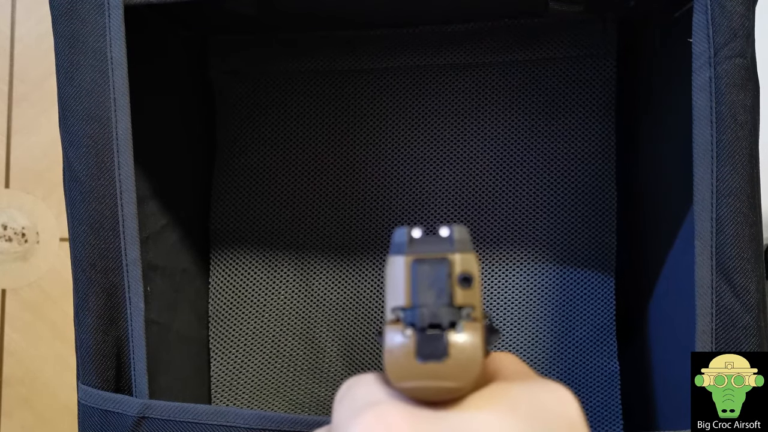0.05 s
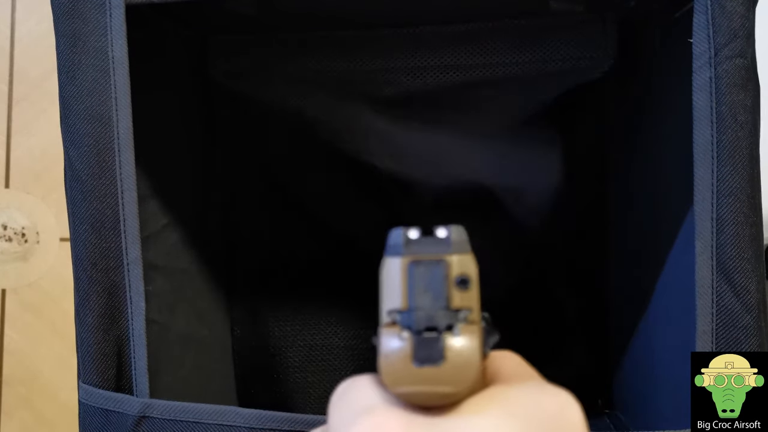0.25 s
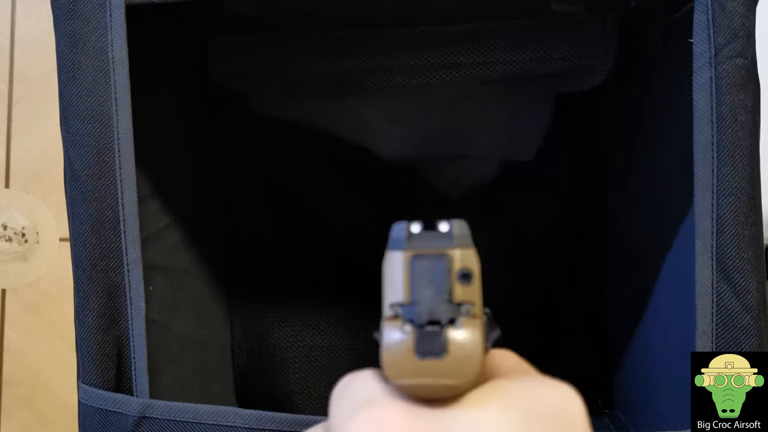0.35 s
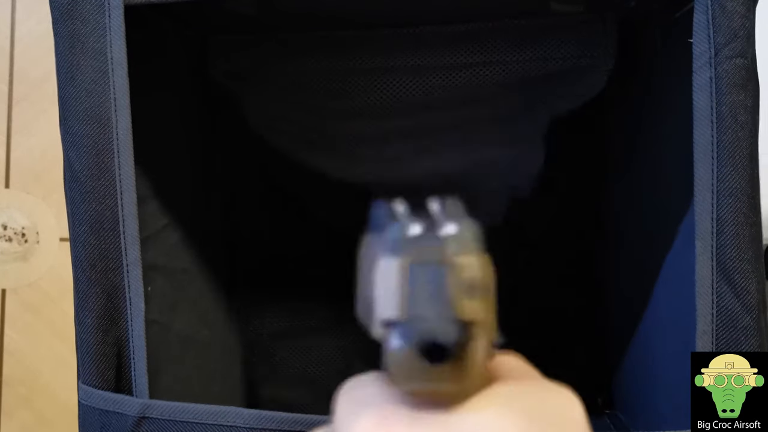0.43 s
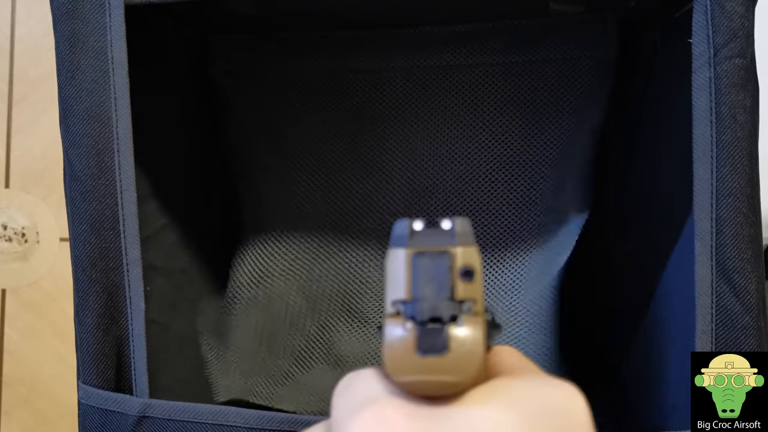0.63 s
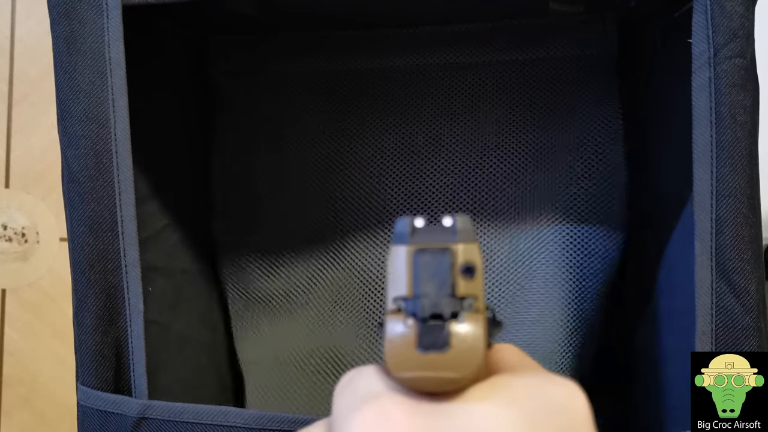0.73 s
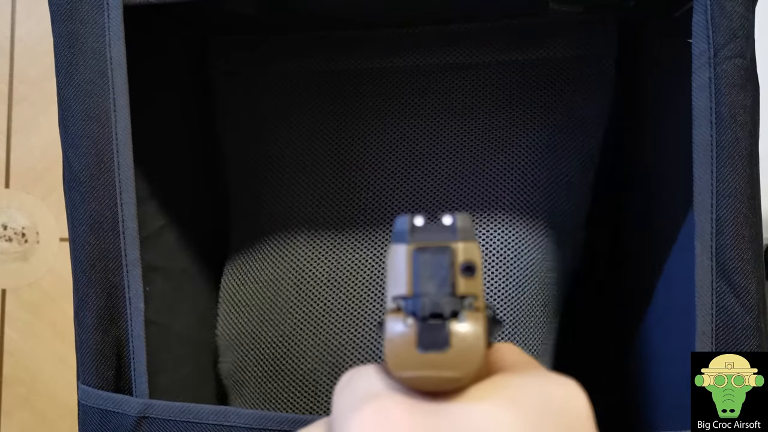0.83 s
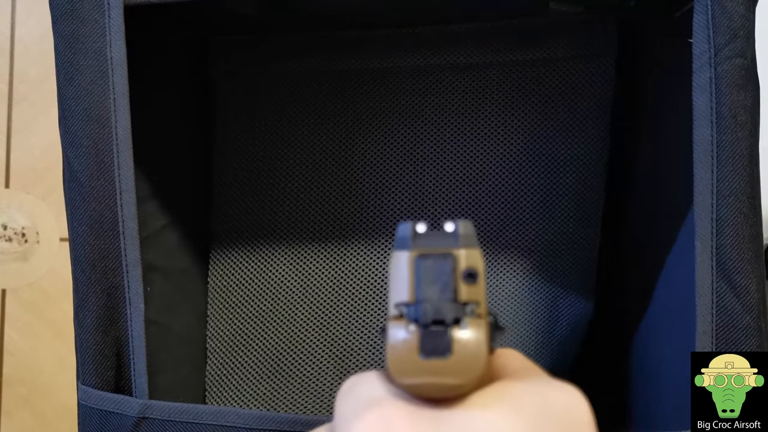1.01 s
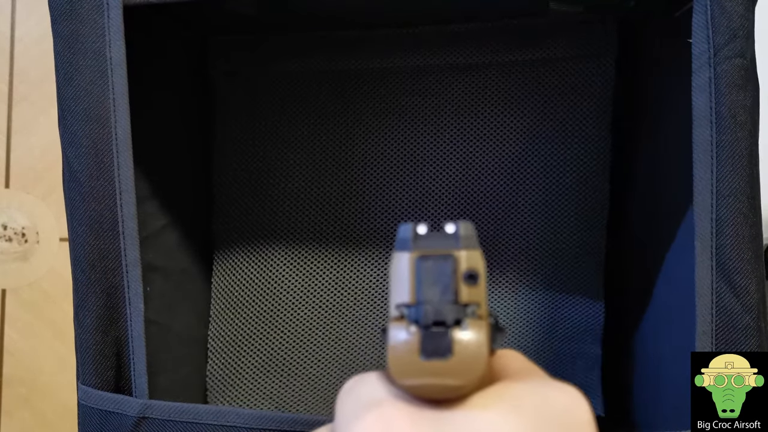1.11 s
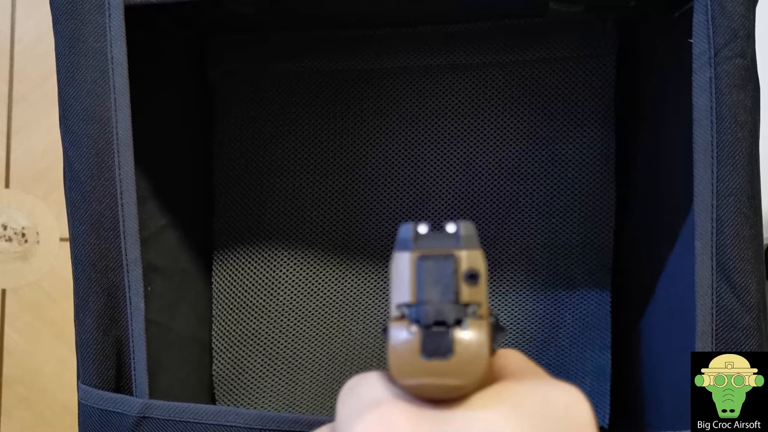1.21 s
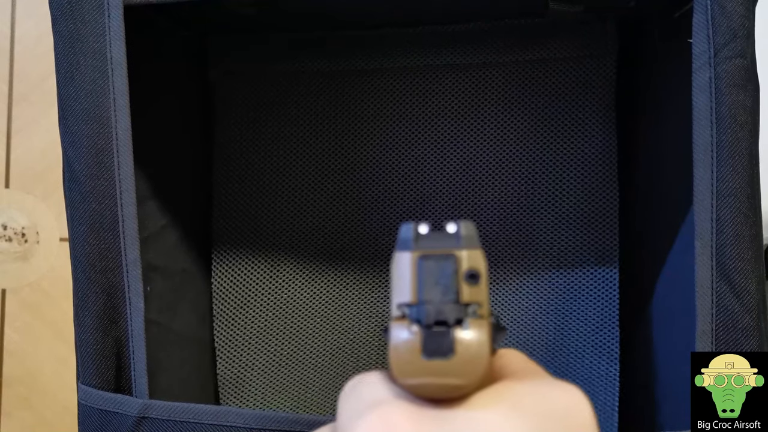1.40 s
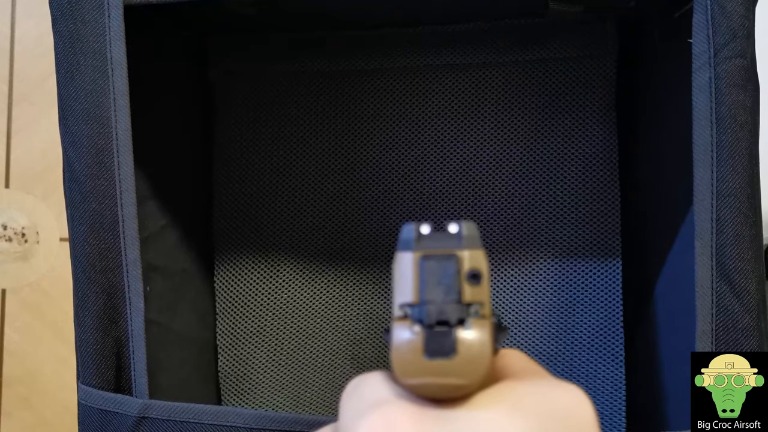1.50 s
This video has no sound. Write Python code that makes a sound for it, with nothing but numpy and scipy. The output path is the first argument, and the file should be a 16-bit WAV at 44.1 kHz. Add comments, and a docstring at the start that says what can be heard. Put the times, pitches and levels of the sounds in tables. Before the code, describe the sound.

A gas airsoft pistol fires at close range in a small room. Faint low motor hum and room noise come first, then a sharp shot at 0.23 seconds with gas hiss, a brief thump and metallic slide clatter, slamming home at 0.28. A second similar shot follows at 0.5. High ringing and short bright reverberation die away, leaving quiet hum and a tiny tick near 1.0.

```python
"""A gas airsoft pistol fires twice at close range in a small room: shaped noise makes the gas hiss, a decaying
sine the thump of air, noise bursts the slide's clatter and slam, decaying sines a high narrow ringing and the
dull frame modes. Noise with frequency-dependent decay gives the room's answer; a motor hums in sines over room
noise, with one faint tick. Automatic gain ducks at each shot and recovers."""
import sys
import numpy as np
from scipy import signal
from scipy.fft import rfft, irfft, next_fast_len
from scipy.io import wavfile
from scipy.ndimage import uniform_filter1d, map_coordinates

SR = 44100
rng = np.random.default_rng(int(sys.argv[2]) if len(sys.argv) > 2 else 0)


def store_wav(level_fs):
    """Save 16-bit WAV to argv[1]."""
    pcm = np.round(np.clip(np.atleast_2d(level_fs), -1, 1) * 32767)
    wavfile.write(sys.argv[1], SR, pcm.T.astype(np.int16))


N = 68355
T = np.arange(N) / SR

# shots: (time [s], gas level [dB], thump level [dB], room answer level [dB])
SHOTS = [(0.229, 2.5, 10, -15.5), (.498, 2, 8.5, -13.5)]


def amp(db):
    """Amplitude factor from dB."""
    return 10 ** (np.asarray(db) / 20)


def unit(x):
    """x scaled to rms 1."""
    return x / np.sqrt(np.mean(x ** 2) + 1e-20)


def along(points, hz):
    """(Hz, value) points interpolated on a log frequency axis."""
    f, v = np.transpose(points)
    return np.interp(np.log(hz + 1), np.log(f + 1), v)


def wobble(rate_hz):
    """Smooth random curve with rate_hz knots a second."""
    knots = rng.standard_normal(int(N * rate_hz / SR) + 4)
    return map_coordinates(knots, [T * rate_hz])


def filtered(x, response):
    """x filtered by a function of frequency."""
    m = next_fast_len(N + 8192)
    return irfft(rfft(x, m) * response(np.fft.rfftfreq(m, 1 / SR)), m)[..., :N]


def rush(spectrum, alike):
    """Stereo noise of rms 1: spectrum in (Hz, dB), left-right correlation in (Hz, -1..1)."""
    def mid_side(hz):
        turn = np.arccos(np.clip(along(alike, hz), -1, 1)) / 2
        return amp(along(spectrum, hz)) * [np.cos(turn), np.sin(turn)]

    mid, side = filtered(rng.standard_normal((2, N)), mid_side)
    return unit(np.array([mid + side, mid - side]))


def fall(start_s, t60_s):
    """Envelope with a sharp onset at start_s and exponential decay."""
    onset_s = 0.0006
    t = np.maximum(T - start_s, 0)
    return (1 - np.exp(-t / onset_s)) * amp(-60 * t / t60_s)


def pan(db):
    """Channel gains for left over right in dB."""
    return amp([[db / 2], [-db / 2]])


def background():
    """Motor sines wavering in level and phase, over shaped room noise, with a faint noise-burst tick."""
    # motor lines: (frequency [Hz], relative level [dB])
    motor_lines = [(48.4, -65.5), (70.0, -68.5), (145.3, -67), (193.8, -60.5), (242.2, -71.5), (339.1, -75)]
    # room noise spectrum: (frequency [Hz], relative level [dB per Hz])
    air_colour = [(12, -33.5), (20, -4.5), (58, -3.06), (104, -2), (198, -13), (285, -11.5), (485, -17.5),
                  (698, -16.5), (1090, -22.5), (1480, -21.5), (3300, -25.5), (4200, -32), (6500, -34.5),
                  (7730, -33), (9000, -46.5), (16000, -75.5)]
    # room noise: (frequency [Hz], left-right correlation [-1..1])
    air_alike = [(50, 1), (300, .8), (2000, .6), (8000, 0.13)]
    # faint tick: (time [s], level [dB])
    ticks = [(.998, -56)]
    # tick spectrum: (frequency [Hz], relative level [dB per Hz])
    tick_colour = [(200, -8), (800, -2), (3000, 0), (4000, -14), (9000, -32)]
    hum_offset_db, hum_waver_db, air_db = 1, 1.5, -62.5

    hum = 0
    for hz, db in motor_lines:
        level = amp(db + hum_offset_db + hum_waver_db * wobble(8))
        hum = hum + level * np.sin(2 * np.pi * hz * T + .4 * wobble(4.4))
    tick = sum(amp(db) * fall(s, 0.017) for s, db in ticks) * rush(tick_colour, [(500, 0.924)])
    air = amp(air_db + .5 * wobble(12)) * rush(air_colour, air_alike)
    return hum + tick + air


def gas():
    """Noise swells steeply up to each shot, holds and dies; muzzle air thumps as a decaying low sine."""
    # hiss spectrum: (frequency [Hz], relative level [dB per Hz])
    hiss_colour = [(88, -36), (150, -10), (504, -9.5), (1100, -4.5), (1450, -8), (2980, -3.5), (6390, -3),
                   (7470, 0.5), (10000, -23), (14800, -29.5), (16000, -54.5)]
    rise_s, hold_s, t60_s = 0.012, 0.005, 0.097  # 60 dB rise ending at the shot, hold, 60 dB fall
    thump_hz, thump_t60_s, thump_pan_db = 71.3, 0.026, -3.5

    shape, thump = 0, 0
    for s, gas_db, thump_db, _ in SHOTS:
        rise_db = 60 * np.minimum(T - s, 0) / rise_s
        fall_db = 60 * np.maximum(T - s - hold_s, 0) / t60_s
        shape = shape + amp(gas_db + rise_db - fall_db)
        tone = np.sin(2 * np.pi * thump_hz * (T - s))
        thump = thump + amp(thump_db) * fall(s, thump_t60_s) * tone
    flutter = amp(1.5 * wobble(400))
    hiss = shape * flutter * rush(hiss_colour, [(200, 1.0), (8000, 0.62)]) * pan(.4)
    return hiss + thump * pan(thump_pan_db)


def slide():
    """Noise cracks on recoil, longer slam and low knock on return; each hit adds high ringing and frame modes."""
    # knocks of slide and pellet in recoil: (time [s], level [dB], left over right [dB])
    clacks = [(0.23, 17, 6.5), (.2325, 6.5, 4.5), (0.235, 18.5, 9), (0.2436, 11.5, 3), (0.2467, 8, 3),
              (.2702, -2.5, 3), (0.499, 12.5, -0.5), (0.5047, 11.5, 6), (0.5081, 8, -4.5),
              (0.511, -6.5, -11.5), (.5152, 5, 22)]
    # slide slams home: (time [s], level [dB], knock level [dB], knock left over right [dB])
    slam_hits = [(0.2812, -2.5, -18, 5.5), (0.5512, -4.5, -18.5, -4.6)]
    # crack spectrum: (frequency [Hz], relative level [dB per Hz])
    clack_colour = [(150, -17), (600, -5.5), (2300, -8), (3500, 0.5), (6400, -7), (7450, 2.5), (9000, -24),
                    (10500, -32.5), (15000, -30), (16000, -46.5)]
    # slam spectrum: (frequency [Hz], relative level [dB per Hz])
    slam_colour = [(88, -26), (150, -6.5), (1040, -22.5), (3420, 0), (4950, -12), (6140, -10), (7470, -5),
                   (10600, -33), (14500, -34), (16000, -41.5)]
    # high narrow ringing: (frequency [Hz], relative level [dB], t60 [s])
    ring_modes = [(7300, -9, .3), (7440, -11, .22)]
    # dull modes of grip and frame: (frequency [Hz], level re hit [dB], t60 [s])
    frame_modes = [(98, -13, .035), (250, -18.5, 0.032), (391.4, -14.5, 0.022), (633, -17.5, 0.022)]
    clack_t60_s, slam_t60_s, knock_peak_s = 0.012, .042, 0.00085
    ring_db, ring_waver_turns = -30, .3
    frame_spread_db, frame_spread_turns = 3, 0.23  # scatter between channels
    alike = [(200, 1.0), (2000, .8), (12000, 0.35)]

    crack_shape = sum(amp(db) * fall(s, clack_t60_s) * pan(lr) for s, db, lr in clacks)
    cracks = crack_shape * rush(clack_colour, alike)
    slam_shape = sum(amp(db) * fall(s, slam_t60_s) for s, db, _, _ in slam_hits)
    slams = slam_shape * rush(slam_colour, alike) * pan(1.5)

    knocks = 0
    for s, _, db, lr in slam_hits:
        u = np.maximum(T - s, 0) / knock_peak_s
        knocks = knocks + amp(db) * u * np.exp(1 - u) * pan(lr)

    hits = [row[:2] for row in clacks + slam_hits]
    ring = 0
    for hz, db, t60_s in ring_modes:
        tone = np.sin(2 * np.pi * (hz * T + ring_waver_turns * wobble(130)))
        strikes = sum(amp(hit_db) * fall(s, t60_s) for s, hit_db in hits)
        ring = ring + amp(db + ring_db) * tone * strikes

    frame = 0
    for s, hit_db in hits:
        for hz, db, t60_s in frame_modes:
            level = amp(hit_db + db + rng.normal(0, frame_spread_db, (2, 1)))
            turns = hz * (T - s) + rng.normal(0, frame_spread_turns, (2, 1))
            frame = frame + level * fall(s, t60_s) * np.sin(2 * np.pi * turns)
    return cracks + slams + knocks + ring + frame


def room(x):
    """Room's answer: convolution with noise whose frequencies each die at their own speed."""
    # reverberation time: (frequency [Hz], t60 [s])
    decay = [(100, .12), (500, 0.28), (2000, 0.2965), (5000, 0.292), (8000, .32), (14000, 0.29)]
    # colour of the answer: (frequency [Hz], relative level [dB])
    wall_colour = [(100, -9.5), (300, -2), (620, -9.5), (2500, 0), (4000, -5), (5500, 4.5), (7300, -2.2),
                   (10000, -2.5), (15000, 0)]
    correlation, delay_samples = 0.277, 300

    noise = rush([(20, 0.019), (20000, 0.00022)], [(20, correlation)])[:, :SR // 2]  # nearly white
    hz, t, z = signal.stft(noise, SR, nperseg=256)
    tail_db = along(wall_colour, hz)[:, None] - 60 * t / along(decay, hz)[:, None]
    tail = signal.istft(z * amp(tail_db), SR, nperseg=256)[1]
    tail = tail / np.linalg.norm(tail[0])
    return signal.fftconvolve(np.pad(x, (delay_samples, 0))[None], tail, axes=1)[:, :N]


def scene():
    """Near pistol with left-right phase lead, a separately levelled room answer per shot, and background."""
    # near sound: (frequency [Hz], phase by which left leads [rad])
    left_lead = [(60, 0.12), (200, 1.2), (1000, .6), (3000, .5), (7300, .8), (12000, 1.4)]
    pistol = gas() + slide()
    shot_index = np.searchsorted([row[0] - .03 for row in SHOTS[1:]], T)  # split 30 ms before the later shot
    wet = 0
    for k, (_, _, _, room_db) in enumerate(SHOTS):
        wet = wet + amp(room_db) * room(pistol.mean(0) * (shot_index == k))
    near = filtered(pistol, lambda hz: np.exp(.5j * along(left_lead, hz) * np.array([[1], [-1]])))
    return near + wet + background()


def record(dry):
    """Look-ahead limiter with linear dB recovery, treble-keyed duck, low cut, soft clip and top cut."""
    knee_db, squeeze_db_per_db, ahead_s, recover_db_per_s = -34.5, 0.3599, .012, 298
    duck_db, duck_from_db, duck_soft_db, duck_above_hz = 9, -53.5, 3, 2000
    low_hz, top_hz, clip_level = 13, 16000, .68

    def level_db(x, size):
        power = np.abs(uniform_filter1d(np.mean(x ** 2, 0), size=size))
        return 10 * np.log10(power + 1e-12)

    def high_pass(x, hz):
        return signal.sosfilt(signal.butter(2, hz, 'high', fs=SR, output='sos'), x)

    need_db = -squeeze_db_per_db * np.maximum(level_db(dry, 256) - knee_db, 0)
    need_db = np.interp(T + ahead_s, T, need_db)
    recovery_db = recover_db_per_s * T
    limit_db = np.minimum(np.minimum.accumulate(need_db - recovery_db) + recovery_db, 0)

    treble_db = level_db(high_pass(dry, duck_above_hz), 500)
    ducked_db = -duck_db / (1 + np.exp((duck_from_db - treble_db) / duck_soft_db))
    gain = amp(uniform_filter1d(limit_db, size=100) + ducked_db)

    held = high_pass(dry, low_hz) * gain
    held = held / (1 + np.abs(held / clip_level) ** 4) ** (1 / 4)
    return filtered(held, lambda hz: np.clip((top_hz + 300 - hz) / 600, 0, 1) ** 2)


dry = scene()
out = record(dry)
store_wav(out)
```